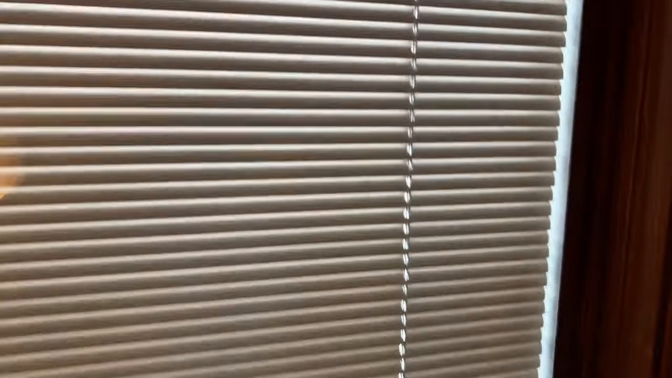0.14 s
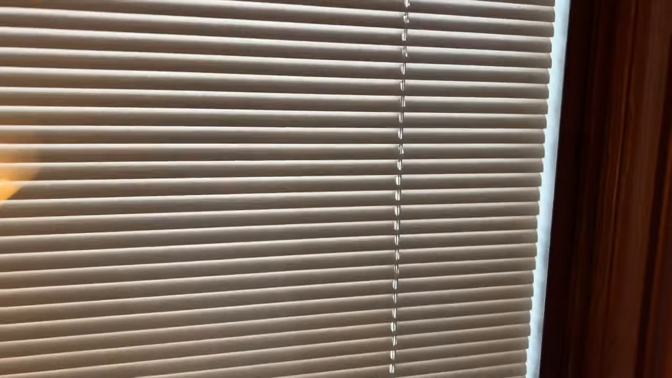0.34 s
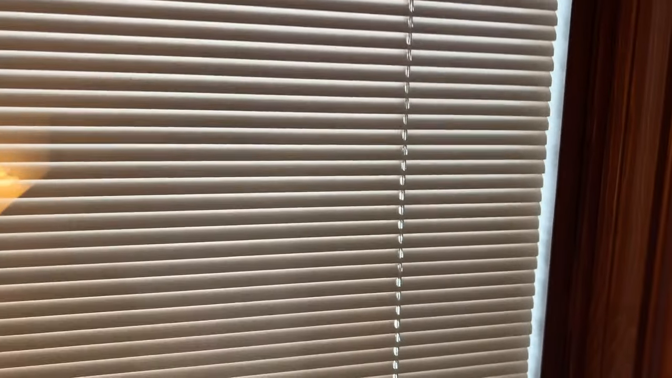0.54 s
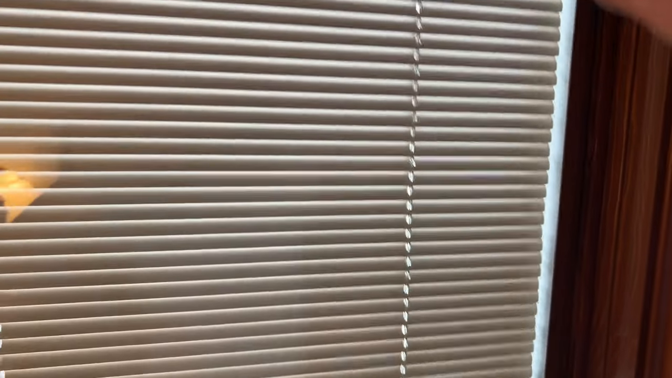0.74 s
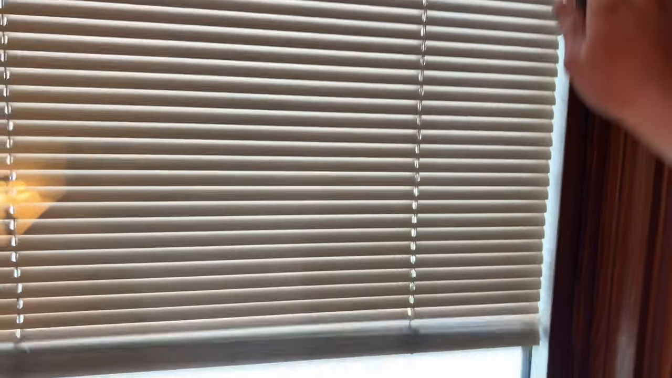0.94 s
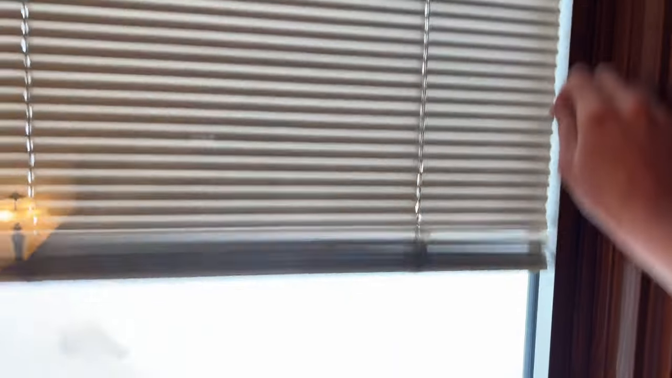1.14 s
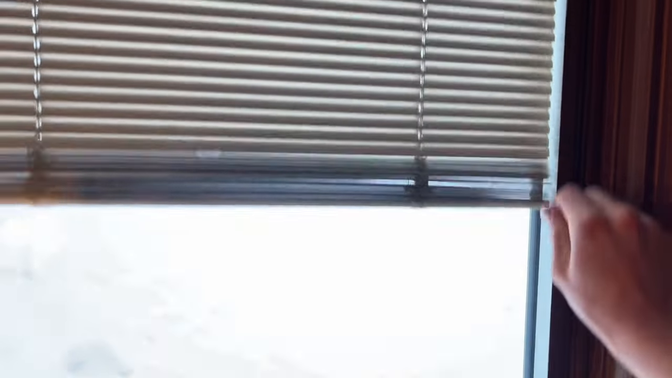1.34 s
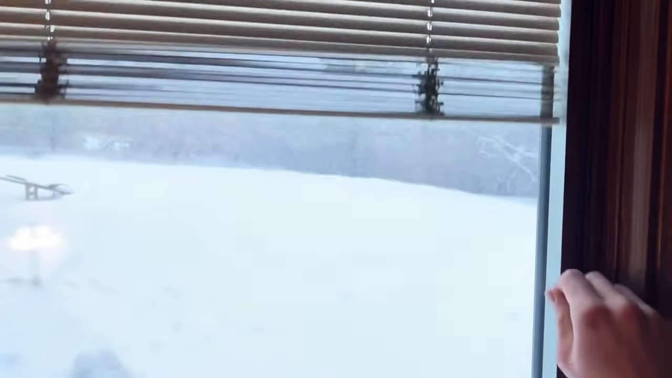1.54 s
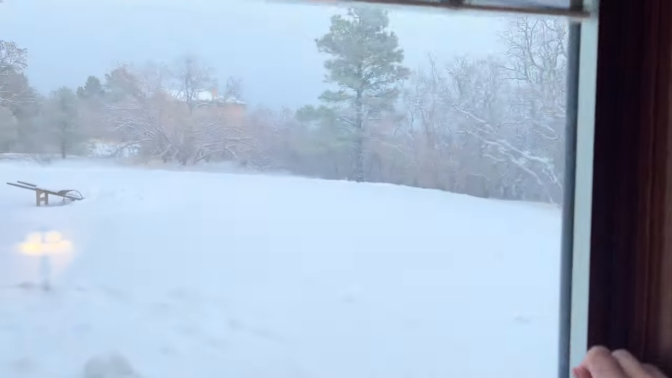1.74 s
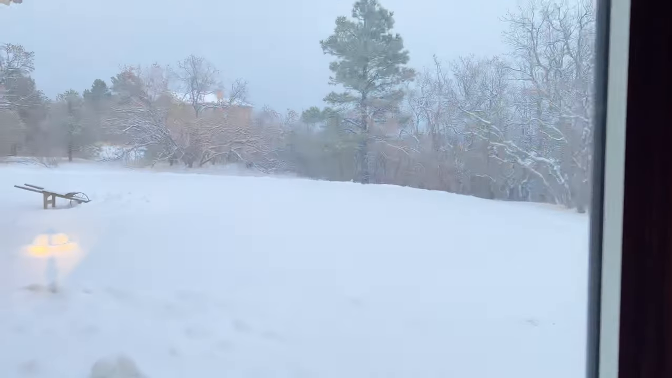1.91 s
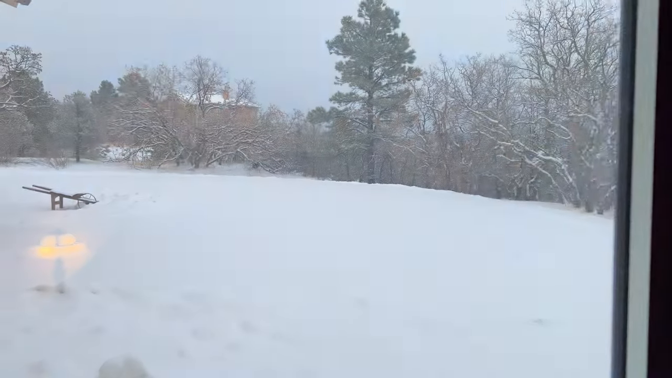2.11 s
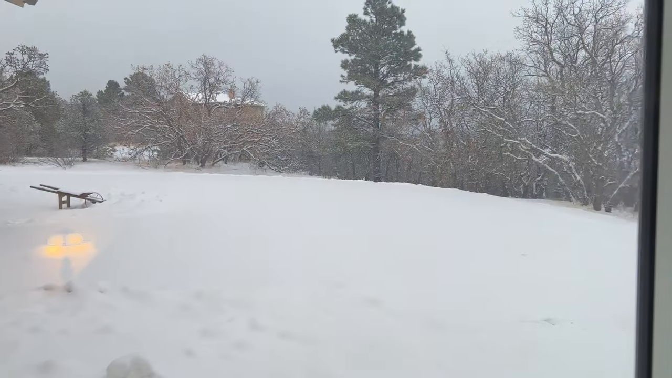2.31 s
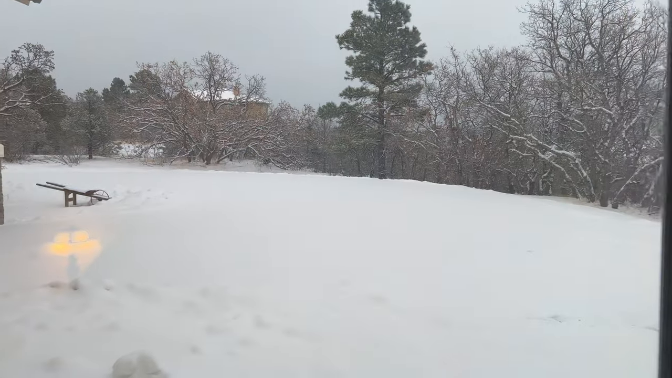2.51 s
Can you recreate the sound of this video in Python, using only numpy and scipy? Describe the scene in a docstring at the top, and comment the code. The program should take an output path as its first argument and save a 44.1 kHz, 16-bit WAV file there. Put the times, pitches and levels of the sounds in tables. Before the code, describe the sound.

A slatted window blind is pulled up close by in a small room. Faint knocks and a thin swish begin around 0.1-0.4 s. From 0.5 s the cord drones, rising in pitch near 1 s, while slats rub, rattle and tinkle. Hard rail knocks stand out at 0.8 and 1.04 s, with thin clinks later and a short rising squeak at 1.5 s. It fades after 2.3 s over low rumble and faint hiss.

```python
"""A slatted window blind is pulled up in a small room, close by, over low rumble and faint hiss. The cord
drones, higher as it runs faster, and shakes the head rail; slats rub, rattle and tinkle. A thin swish opens the
pull; then the bottom rail knocks on the frame and slat edges tick. A small metal part clinks later, and the
cord squeaks once, rising. Noise is shaped by filters and resonances; drone, rings and squeak are sines."""
import sys
import numpy as np
from scipy import signal
from scipy.fft import rfft, irfft, next_fast_len
from scipy.io import wavfile
from scipy.ndimage import uniform_filter1d

SR = 44100
rng = np.random.default_rng(int(sys.argv[2]) if len(sys.argv) > 2 else 0)


def wrap_up_sound(samples):
    """Save the sound to the file named by the first command line argument, as 16-bit audio."""
    columns = np.atleast_2d(samples).T
    # keep every value between -1 and 1, then stretch to whole-number steps
    tamed = np.clip(columns, -1, 1)
    steps = np.round(tamed * 32767).astype(np.int16)
    wavfile.write(sys.argv[1], SR, steps)


N = 116865
TIME = np.arange(N) / SR
SIZE = next_fast_len(N + SR // 2, True)
FREQ = np.fft.rfftfreq(SIZE, 1 / SR)

# Colour of the rubbing slats. Each row: frequency in Hz, relative level in dB per Hz.
RUSTLE_COLOUR = [(200, -14), (420, -11), (520, -13), (620, -2), (1130, -3), (1400, 0.5), (1750, -1.5),
                 (2050, -10), (2400, -20.5), (5000, -33), (16000, -68)]


def amp(db):
    """Decibels to gain."""
    return 10 ** (np.asarray(db) / 20)


def decay(t, t60):
    """Exponential fall of 60 dB in t60 seconds."""
    return 1000 ** (-t / t60)


def sine(hz, t):
    """Steady sine from phase 0."""
    return np.sin(2 * np.pi * hz * t)


def noise():
    """White noise of the scene's length."""
    return rng.standard_normal(N)


def evened(x):
    """Scales to rms 1."""
    return x / np.sqrt(np.mean(x ** 2) + 1e-20)


def steadied(x, hold, window_s=.03):
    """Evens out part of the chance swells of a noise; rms 1."""
    window = max(int(window_s * SR), 1)
    power = abs(uniform_filter1d(x ** 2, window)) + 1e-9
    return evened(x / power ** (np.clip(hold, 0, 1) / 2))


def read(points, hz):
    """Interpolates a spectrum table on a log-frequency axis."""
    f, value = np.transpose(points)
    return np.interp(np.log(hz + 1), np.log(f + 1), value)


def curves(table):
    """Interpolates each column of a time table, sample by sample."""
    t, *columns = np.transpose(table)
    return [np.interp(TIME, t, c) for c in columns]


def add(mix, start_s, sound):
    """Adds a sound into the mix at a time, in place."""
    part = mix[..., max(round(start_s * SR), 0):][..., :sound.shape[-1]]
    part += sound[..., :part.shape[-1]]


def wander(rate_hz):
    """Slow random signal of rms 1: noise rolled off above rate_hz."""
    spectrum = rfft(rng.standard_normal(SIZE))
    return evened(irfft(spectrum / (1 + (FREQ / rate_hz) ** 4), SIZE)[:N])


def colour(x, points):
    """Minimum-phase filter of unit energy with the given spectrum."""
    log_gain = np.log(amp(read(points, abs(np.fft.fftfreq(4096, 1 / SR)))))
    minimum_phase = np.exp(np.conj(signal.hilbert(log_gain)))
    taps = np.fft.ifft(minimum_phase).real[:2048]
    return signal.fftconvolve(x, taps / np.linalg.norm(taps))[:N]


def resonate(x, hz, width_hz):
    """Fixed or moving resonance of gain 1: shift to 0 Hz, one-pole low-pass, shift back."""
    turn = np.exp(2j * np.pi * np.cumsum(hz * np.ones(N)) / SR)
    r = np.exp(-np.pi * width_hz / SR)
    return 2 * (turn * signal.lfilter([1 - r], [1, -r], x / turn)).real


def spread(a, b):
    """Mixes two unrelated sounds into a left and right that are partly alike."""
    # Each row: frequency in Hz, left-right likeness from 0 to 1.
    likeness = [(100, 0.97), (300, 0.96), (600, 0.44), (1500, 0.14), (3000, 0.33), (6000, 0.22), (9500, 1),
                (16000, 1)]
    same = np.clip(read(likeness, FREQ), 0, 1)
    mid = rfft(a, SIZE) * np.sqrt((1 + same) / 2)
    side = rfft(b, SIZE) * np.sqrt((1 - same) / 2)
    return irfft([mid + side, mid - side], SIZE)[:, :N]


def room(x, wet_db, near_db, near_t60):
    """Direct sound, quick echoes of the window recess and the tail of the room."""
    # Decay of the tail. Each row: frequency in Hz, t60 in seconds.
    tail_t60 = [(100, 0.18), (500, 0.042), (1500, 0.3), (5000, 0.18), (16000, 0.042)]
    size = SR // 2
    age = np.arange(size) / SR
    # sparse random echoes, none in the first 3 ms
    taps = rng.standard_normal((2, 2, size)) * (rng.random((2, 2, size)) < .12)
    taps *= age > .003
    hz, t, bins = signal.stft(taps[0], SR, nperseg=256)
    bins = bins * decay(t, read(tail_t60, hz)[:, None])
    tail = signal.istft(bins, SR, nperseg=256)[1][:, :size]
    near = taps[1] * decay(age, near_t60)
    echo = np.zeros((2, size))
    for db, part in [(wet_db, tail), (near_db, near)]:
        echo += amp(db) * part / np.linalg.norm(part, axis=1, keepdims=True)
    echo[:, 0] = 1  # direct sound
    return signal.fftconvolve(x[None], echo, axes=1)[:, :N]


def air(rumble_db=-42, hiss_db=-60):
    """Low steady rumble of the room and a faint hiss, both coloured noise."""
    # Two spectra. Each row: frequency in Hz, relative level in dB per Hz.
    rumble_colour = [(26, -36), (52, -9), (70, -9.5), (95, -15), (300, -23), (1000, -27.5), (3000, -67),
                     (16000, -51)]
    faint_colour = [(2000, -18), (4400, -42), (5000, 7), (5600, 12), (6200, -7), (8000, 1), (9300, 13),
                    (11000, -38), (16000, -25)]
    rumble = spread(*[colour(noise(), rumble_colour) for _ in range(2)])
    hiss = spread(*[colour(noise(), faint_colour) for _ in range(2)])
    return amp(rumble_db) * rumble + amp(hiss_db) * hiss


def cord(drone_db=0, rail_db=-4, jitter=0.0247, jitter_hz=35, flutter_hz=55, skirt=4, mid_pull_hz=236):
    """The cord chatters over its roller at an unsteady rate and shakes the head rail."""
    # Drone, following the pull's speed. Each row: time in seconds, mean pitch in Hz, level in dB.
    pull = [(0, 156, -59), (.09, 173.5, -38), (.2, 170.8, -40), (.34, 177.1, -29), (.42, 170.4, -36.5),
            (.54, 169.9, -23.5), (.575, 164.4, -32), (.605, 173, -17), (.67, 174.6, -24.5),
            (.72, 225.6, -25.5), (.8, 253.3, -25.5), (.99, 212.8, -30.5), (1.07, 303.6, -21),
            (1.15, 306.4, -23.5), (1.27, 245.5, -23), (1.43, 268, -24), (1.58, 243.6, -23),
            (1.67, 270.2, -20), (1.75, 277.8, -28.5), (1.79, 267, -15), (1.83, 278, -26),
            (1.89, 284.5, -20.5), (2.03, 254, -25.5), (2.1, 225, -46), (2.19, 178, -26), (2.28, 173.2, -22),
            (2.43, 166.3, -41.5), (2.65, 169.5, -48)]
    # Force of the pull. Each row: time in seconds, level in dB before rail_db.
    effort = [(0, -54), (.1, -35.5), (.42, -29.5), (.72, -20.5), (1.1, -16.5), (1.55, -20.5), (1.9, -19.5),
              (2.28, -24), (2.47, -36.5), (2.6, -31), (2.65, -39.5)]
    # Head rail resonances. Each row: frequency in Hz, width in Hz, level in dB at mid_pull_hz,
    # rise in dB per octave of the pull's pitch.
    rail_modes = [(112.5, 5, -12.5, 3), (128.6, 16.8, -6, -3.5), (172.7, 19, -3.5, 3.5),
                  (236.6, 23, -6, 0.5), (319.7, 40, -1.5, 11.5), (371.3, 26, -5, 2), (453.7, 35, -10, 2.5),
                  (602, 29.7, -8, 11), (679.6, 19, -15, 9)]
    hz, drone_level = curves(pull)
    (effort_level,) = curves(effort)
    turns = np.cumsum(hz * (1 + jitter * wander(jitter_hz))) / SR
    drone = evened(np.sin(2 * np.pi * turns) * (1 + .42 * wander(flutter_hz)))
    octaves = np.log2(hz / mid_pull_hz)

    def rail():
        total = np.zeros(N)
        for f, width, db, rise in rail_modes:
            ringing = resonate(resonate(noise(), f, width), f, skirt * width)
            total += amp(db + rise * octaves) * evened(ringing)
        return steadied(total, hold=.8)

    shake = spread(rail(), rail())
    return amp(drone_level + drone_db) * drone + amp(effort_level + rail_db) * shake


def patter(per_s, spread_db, rub):
    """Tiny contacts of uneven size over smooth rubbing."""
    size = amp(spread_db * np.minimum(rng.exponential(1, N), 4)) * noise()
    contacts = evened(size * (rng.random(N) < per_s / SR))
    return evened(contacts + rub * noise())


def slat_ring(per_s=45, t60=0.097, spread_db=2):
    """Slats tap each other and ring; the colour shifts as the stack grows."""
    # Each row: frequency in Hz, relative level in dB at mid-time, its change in dB per second.
    slat_modes = [(761, -6.5, 9.5), (976, -1, -4), (1118, 1, 10), (1192, -4, -8.5), (1298, -6.5, 19.5),
                  (1418, 5.5, 4), (1508, -5, 4), (1778, -5, 8.5), (1999, -1.5, 5.5), (2373, -17.5, -2)]
    out, t = np.zeros(N), np.arange(SR // 8) / SR
    for f, db, db_per_s in slat_modes:
        taps = patter(per_s, spread_db, 0) * amp(db + db_per_s * (TIME - TIME.mean()))
        out += signal.oaconvolve(taps, decay(t, t60) * sine(f, t))[:N]
    return steadied(out, hold=0.38, window_s=0.12)


def pings(low_hz, high_hz, per_s, t60, spread_db, count=24):
    """Many small slat contacts, each ringing briefly at one of count pitches."""
    out, t = np.zeros(N), np.arange(SR // 16) / SR
    for f in np.linspace(low_hz, high_hz, count):
        size = amp(spread_db * np.minimum(rng.exponential(1, N), 3))
        hits = size * (rng.random(N) < per_s / count / SR)
        out += signal.oaconvolve(hits, decay(t, t60) * sine(f, t))[:N]
    return evened(out)


def slats(rustle_db=-1.0, hiss_db=1.0, rattle_db=-3, tinkle_db=-5, grit_low_db=-6, grit_high_db=-5,
          flicker_db=0.27, flicker_hz=35):
    """Slats rub, rattle and tinkle on each other as they gather; their edges click like grit."""
    # Sliding. Each row: time in seconds, body gain in dB, top gain in dB.
    slide = [(0.0, -45, -64), (0.1, -40, -48), (0.26, -35.5, -46.5), (.35, -39, -52), (0.46, -33, -47.5),
             (0.62, -30, -40), (.98, -30.5, -41), (1.12, -26, -37), (1.42, -30, -40), (1.84, -28, -38.5),
             (2.04, -30.5, -41), (2.33, -37.5, -47.5), (2.47, -47, -60.5), (2.56, -41.5, -54.5),
             (2.65, -51, -67)]
    # Each row: frequency in Hz, relative level in dB per Hz.
    hiss_colour = [(800, -60), (2200, 3.5), (2900, -4.5), (3600, 6), (4400, -3.5), (5250, 4.5),
                   (5650, -0.5), (6100, -2.5), (8000, -4), (10300, -2.5), (12300, -7), (14600, -5),
                   (16000, -20)]
    body_level, top_level = curves(slide)
    rustle = spread(*[colour(patter(per_s=650, spread_db=-1.0, rub=0.9), RUSTLE_COLOUR) for _ in range(2)])
    hiss = spread(*[colour(patter(per_s=860, spread_db=3.5, rub=3.9), hiss_colour) for _ in range(2)])
    rattle = spread(slat_ring(), slat_ring())
    tinkle = spread(*[pings(low_hz=4843, high_hz=5720, per_s=110, t60=0.054, spread_db=4.5)
                      for _ in range(2)])
    clicks = patter(per_s=110, spread_db=0, rub=0)
    grit = evened(room(clicks, wet_db=-6, near_db=0, near_t60=.018))
    grit_low = np.array([colour(side, RUSTLE_COLOUR) for side in grit])
    grit_high = np.array([colour(side, hiss_colour) for side in grit])
    body = amp(rustle_db) * rustle + amp(rattle_db) * rattle + amp(grit_low_db) * grit_low
    top = amp(hiss_db) * hiss + amp(tinkle_db) * tinkle + amp(grit_high_db) * grit_high
    flicker = amp(flicker_db * wander(flicker_hz))
    return flicker * (amp(body_level) * body + amp(top_level) * top)


def swish(level_db=-5, width_hz=380):
    """A thin whistle of cord sliding through its guide as its slack is taken up."""
    # Each row: time in seconds, level in dB before level_db, whistle in Hz.
    whistle = [(0, -90, 5500), (.07, -48, 5600), (.13, -43.5, 5800), (.2, -42, 5720), (.36, -92, 5200)]
    level, hz = curves(whistle)
    sides = [evened(resonate(resonate(noise(), hz, width_hz), hz, width_hz)) for _ in range(2)]
    return amp(level + level_db) * spread(*sides)


def knocks(clack_db=6, ring_db=-3, near_t60=0.012, chatter_db=-10, chatter_t60=0.098,
           low_cut_hz=440, rebound_s=0.002193, rebound_db=8):
    """The bottom rail hits the frame, rings and rebounds at once; the jolted slats chatter on briefly."""
    # Each row: start in seconds, level in dB, ratio that scales clack pitch and rebound rate.
    blows = [(.171, -36, 1), (.259, -31, 1.25), (.3855, -19.5, 1.11), (.4193, -19.5, 1.05),
             (.438, -24.5, 1.01), (.551, -17.5, .95), (.573, -26, .9), (.79, -14, .9), (.826, -23, .97),
             (.9405, -20, .9), (1.0432, -13, .96), (1.0745, -21, .8), (1.177, -27, 1.2), (1.261, -20, 1.04),
             (1.47, -28, 1), (1.592, -28, 1.1), (1.714, -24.5, 1.1), (1.7455, -17, .97), (1.933, -27, 1),
             (2.31, -33, 1.1), (2.421, -34.5, 1.2)]
    # Ringing. Each row: frequency in Hz, level in dB before ring_db, t60 in seconds.
    knock_modes = [(615, -22, .07), (700, -21, .06), (990, -11, .045), (1095, -14, .04), (1290, -16, .03),
                   (1500, -16, .035), (1760, -16, .03), (2040, -19, .035)]
    # Short clack. Each row: frequency in Hz at ratio 1, relative level in dB per Hz.
    clack_colour = [(30, -47), (150, -43), (520, -16.5), (680, -3), (800, -17), (980, 14.5), (1180, 7.5),
                    (1450, 3), (1760, 11.5), (2100, -11), (2450, -74), (3000, -3.5), (3600, -18),
                    (4400, -15), (5400, -10.5), (7000, -35.5), (16000, -32)]
    out, jolt, t = np.zeros((2, N)), np.zeros(N), np.arange(SR // 8) / SR
    # the knocks carry little bass
    low_cut = signal.butter(2, low_cut_hz, "highpass", fs=SR, output="sos")
    for s, db, pitch in blows:
        blow = amp(ring_db) * sum(amp(d) * decay(t, t60) * sine(f, t) for f, d, t60 in knock_modes)
        clack = colour(np.ones(1), [(f * pitch, d) for f, d in clack_colour])
        add(blow, 0, amp(clack_db) * clack)
        blow = signal.sosfilt(low_cut, blow)
        both = blow.copy()
        add(both, rebound_s / pitch, blow * amp(rebound_db))
        hit = room(both, wet_db=-9, near_db=-5, near_t60=near_t60)
        add(out, s, amp(db) * hit / hit[:, :SR // 100].std())  # level is that of the first 10 ms
        add(jolt, s, amp(db) * decay(t, chatter_t60))
    chatter = spread(*[colour(jolt * patter(per_s=1600, spread_db=-2, rub=1.0), RUSTLE_COLOUR)
                       for _ in range(2)])
    return out + amp(chatter_db) * chatter


def ticks(level_db=0):
    """A slat edge catches and scrapes for a moment: a noise burst that swells and dies."""
    # Each row: start in seconds, length in seconds (twice the time to the peak), level in dB.
    catches = [(0.184, 0.0022, -35), (0.383, 0.00053, -21), (0.4183, 0.00094, -19), (0.445, 0.0013, -41),
               (0.5482, 0.0014, -19), (0.787, 0.0033, -18.5), (1.0425, 0.0033, -19), (1.26, 0.0033, -17.5),
               (1.495, 0.0019, -20), (1.527, 0.003, -31), (1.695, 0.0032, -22.5), (1.743, 0.0031, -28),
               (1.8255, 0.0052, -29), (2.305, 0.0012, -35)]
    # Each row: frequency in Hz, relative level in dB per Hz.
    scrape_colour = [(600, 0), (2500, 0), (3600, 10.5), (4400, -23), (5500, 8), (7000, 7), (8500, -2.5),
                     (10500, 7), (12500, -1), (16000, 7)]
    out, t = np.zeros(N), np.arange(SR // 16) / SR
    for s, length, db in catches:
        age = 2 * t / length
        add(out, s, amp(db) * rng.standard_normal(len(t)) * 2 * age * np.exp(-age))
    return amp(level_db) * room(colour(out, scrape_colour), wet_db=-9, near_db=-8.5, near_t60=0.0037)


def clinks(level_db=-1, base_t60=0.013, overtone_ratio=2.682, overtone_t60=0.015):
    """A small metal part clinks thinly, with the overtone of a small bar."""
    # Each row: start in seconds, swell in seconds, pitch in Hz, level in dB before level_db,
    # overtone in dB relative to the pitch.
    chimes = [(0.7028, 0.0017, 5310, -24.5, -30), (0.929, 0.0026, 5170, -24.5, -20),
              (1.2604, 0.00063, 5500, -15.5, -19), (1.422, 0.0027, 5580, -22, -6),
              (1.4963, 0.0027, 5430, -19.5, -1), (1.654, 0.0044, 5320, -24, -14),
              (1.695, 0.0041, 5353, -19.5, -10), (1.8241, 0.0041, 5680, -24.5, -4)]
    out, t = np.zeros(N), np.arange(SR // 12) / SR
    for s, swell_s, hz, db, overtone_db in chimes:
        partials = [(hz, base_t60, db), (hz * overtone_ratio, overtone_t60, db + overtone_db)]
        for f, t60, part_db in partials:
            shape = np.minimum(t / swell_s, 1) * decay(np.maximum(t - swell_s, 0), t60)
            add(out, s, amp(part_db) * shape * sine(f, t))
    return amp(level_db) * room(out, wet_db=-10.0, near_db=-15, near_t60=0.027)


def squeak(level_db=-24, rough=0.5, rough_hz=250):
    """Stick and slip of the cord makes one short rising chirp."""
    # One row: start in seconds, length in seconds, first pitch in Hz, last pitch in Hz.
    slip = (1.511, .032, 940, 1950)
    start, length, from_hz, to_hz = slip
    along = np.clip((TIME - start) / length, 0, 1)
    turns = np.cumsum(from_hz + (to_hz - from_hz) * along) / SR
    swell = np.sqrt(abs(np.sin(np.pi * along)))
    chirp = np.sin(2 * np.pi * turns) * swell * (1 + rough * wander(rough_hz))
    return room(amp(level_db) * chirp, wet_db=-17, near_db=-6.0, near_t60=0.05)


def scene():
    """Everything that sounds at the window, and the air of the room."""
    return air() + cord() + slats() + swish() + knocks() + ticks() + clinks() + squeak()


def record(dry, edge_hz=15900):
    """Left and right differ in level and phase across frequency; then clipping and the band limit."""
    # Each row: frequency in Hz, left minus right in dB.
    lean = [(60, 1), (160, 3.5), (400, 2), (740, 4.5), (1220, 4), (2010, 8), (3330, 3.5), (4400, 12),
            (5400, 15.5), (6800, 1.5), (8500, -0.5), (16000, 0)]
    # Each row: frequency in Hz, phase in radians by which left leads.
    lead = [(60, 0), (300, .3), (600, .5), (870, -1.1), (1400, -.5), (1700, -2.3), (2100, -2.9), (2400, -1),
            (2800, -1.2), (3400, 1.3), (5000, 1), (5350, 3.3), (6000, 3.1), (6400, .4), (8000, -.8),
            (9300, -2.9), (10700, -3.35), (12300, -5.6), (16000, -7.5)]
    half = amp(read(lean, FREQ) / 2) * np.exp(.5j * read(lead, FREQ))
    sides = irfft(rfft(dry, SIZE) * np.array([half, 1 / half]), SIZE)[:, :N]
    low_pass = signal.firwin(301, edge_hz, window=("kaiser", 9), fs=SR)
    return signal.oaconvolve(np.clip(sides, -1, 1), low_pass[None], "same")


dry = scene()
out = record(dry)
wrap_up_sound(out)
```